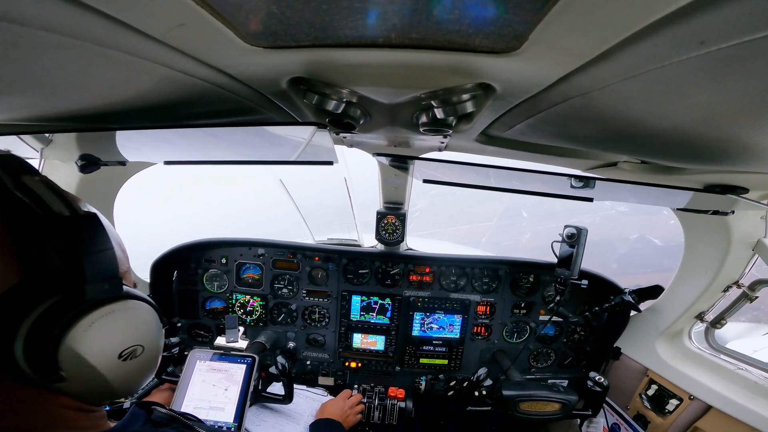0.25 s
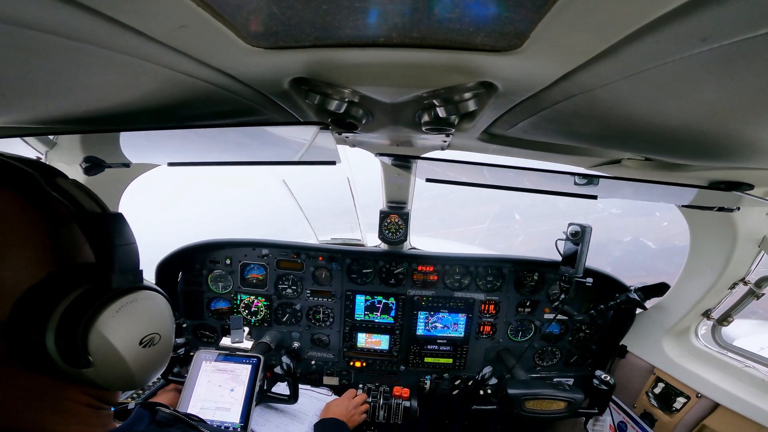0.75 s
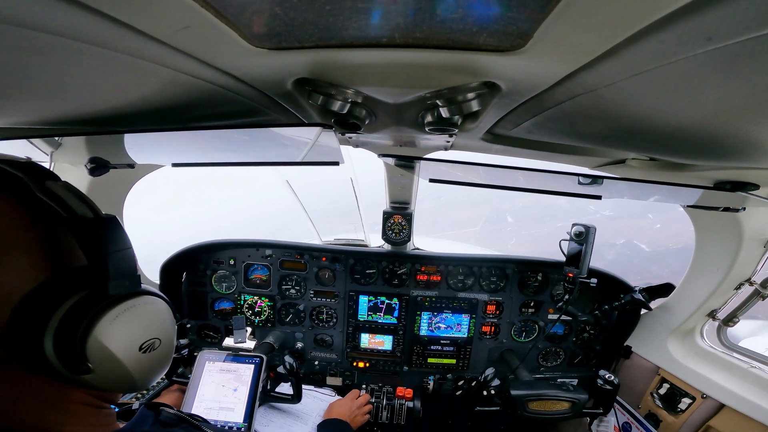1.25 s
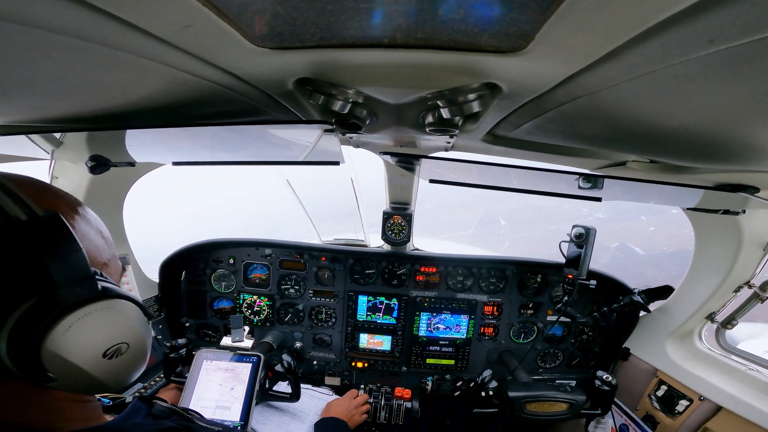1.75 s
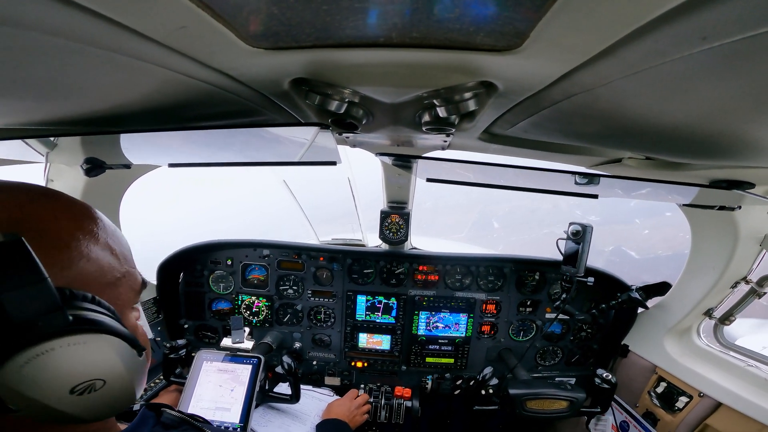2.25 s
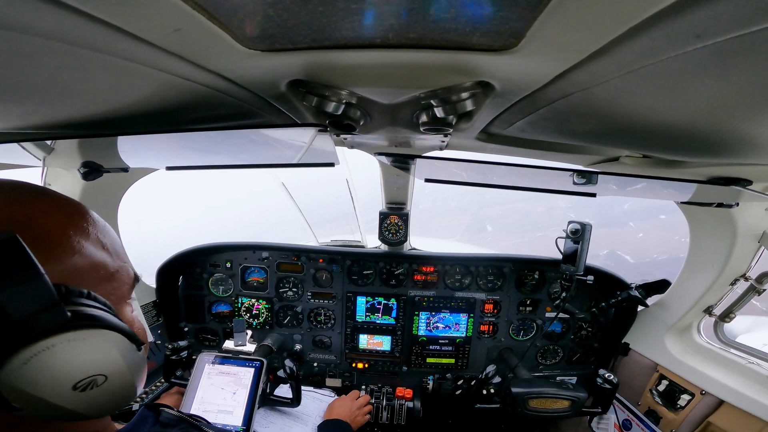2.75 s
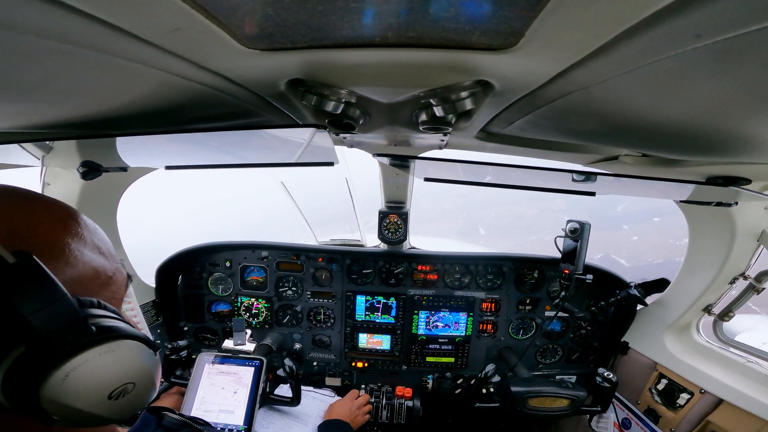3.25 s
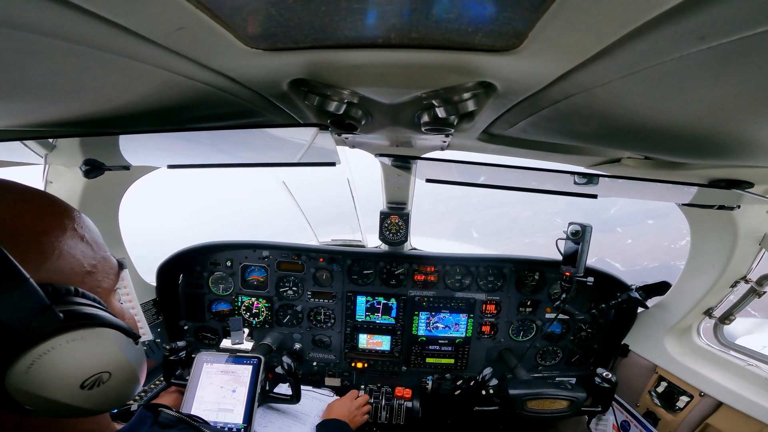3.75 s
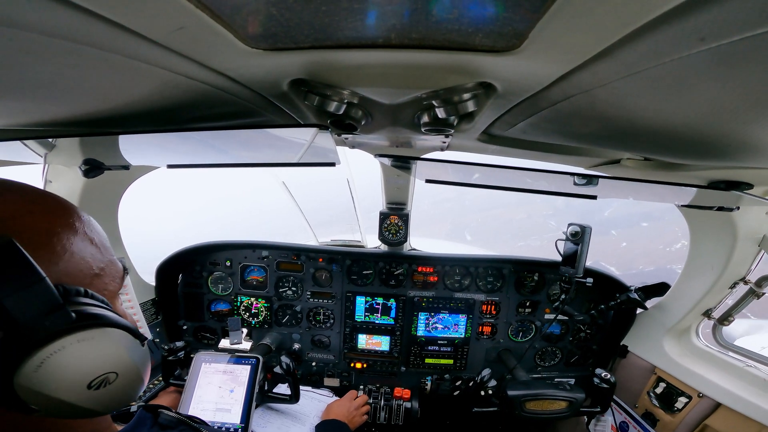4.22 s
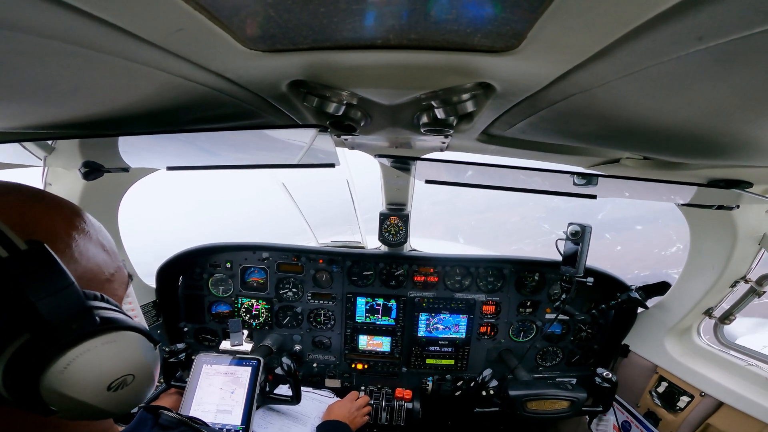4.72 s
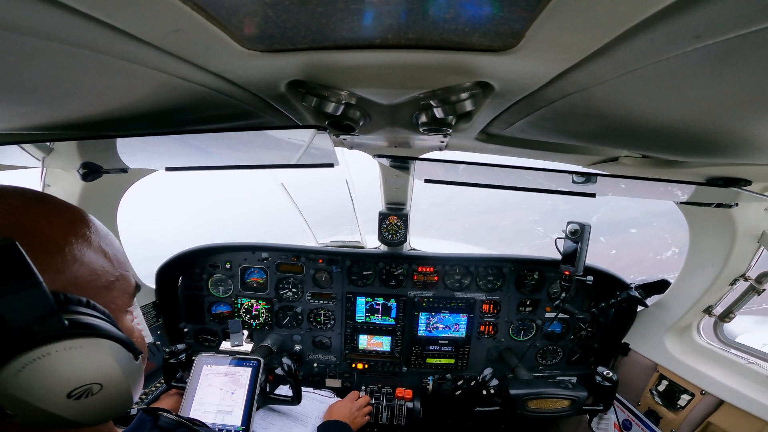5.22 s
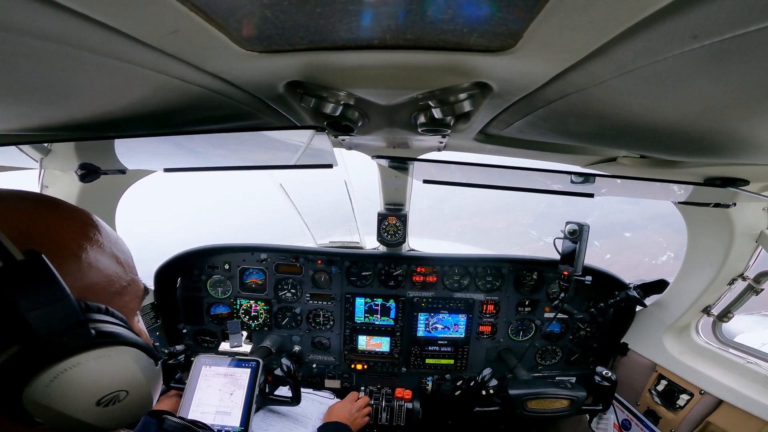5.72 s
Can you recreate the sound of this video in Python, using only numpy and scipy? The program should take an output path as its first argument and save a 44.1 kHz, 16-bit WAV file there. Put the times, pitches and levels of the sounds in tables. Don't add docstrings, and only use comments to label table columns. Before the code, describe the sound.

Steady deep drone of twin piston engines and propellers inside a small aircraft cockpit, with booming cabin rumble and soft windscreen hiss.

```python
import sys
import numpy as np
from scipy import signal
from scipy.fft import rfft, irfft, next_fast_len
from scipy.io import wavfile
from scipy.ndimage import uniform_filter1d, minimum_filter1d

SR = 44100
rng = np.random.default_rng(int(sys.argv[2]) if len(sys.argv) > 2 else 0)


def linear_from_db(decibels):
    return 10 ** (np.asarray(decibels, float) / 20)


def wav_record(signal):
    frames = np.transpose(np.atleast_2d(signal))
    bounded = np.clip(frames, -1, 1)
    quanta = np.round(bounded * 32767).astype(np.int16)
    wavfile.write(sys.argv[1], SR, quanta)


N = 263718

# (time [s], shaft speed [Hz])
SHAFT_SPEED = [(0.0, 37.673), (0.52, 37.511), (0.91, 37.874), (1.28, 37.711), (1.84, 37.697), (2.1, 37.506),
               (2.93, 37.848), (3.56, 37.503), (3.96, 37.798), (4.5, 37.517), (5.02, 37.444),
               (5.42, 37.645), (5.98, 37.554)]
# (time [s], angle ahead [rad])
SHAFT_SLIP = [(0.0, 0.0), (1.09, -0.63), (1.68, -0.52), (2.28, -0.25), (2.89, -0.5), (3.53, -0.23),
              (4.03, -0.38), (5.14, -0.45), (5.63, -1.12), (5.98, -1.36)]
# (multiple of shaft speed [1], left level [dB], right level [dB], left lag [rad], right lag [rad])
SHARED_HUMS = [
    (1, -46, -40.5, 0, 2.43),
    (3, -46.5, -60, 2.4, 2.46),
    (6, -61, -49, 2.27, 3.33),
    (9, -72, -52.5, 0, .16),
]
# (multiple of shaft speed [1], level [dB])
ENGINE_HUMS = [(.5, -65), (1.5, -63), (2, -68.5), (2.5, -67), (3.5, -61), (4, -59.5), (4.5, -60),
               (5, -64.5), (5.5, -62.5), (7, -62.5), (7.5, -72.5), (8.5, -73), (10, -68), (12, -68.5),
               (12.5, -76), (13, -75.5), (13.5, -80), (14, -76.5), (15, -78), (16, -73.5), (18, -75.5),
               (19.5, -78.5), (22, -77), (25.5, -80), (40.5, -84), (20, -82), (21.5, -81), (22.5, -81),
               (23, -84), (25, -80)]
RIGHT_HUMS = (4.5, 7, 9, 10, 16, 18, 22)
# (time [s], level over mean [dB])
LEFT_LOAD = [(0, 4.5), (.3, -2), (1.5, 2), (2.4, 0.5), (2.7, -2), (3.1, -2), (3.75, 4.5), (4.3, 0),
             (4.92, -4.5), (5.2, 3), (5.6, -2.5), (5.98, 5.5)]
# (time [s], level over mean [dB])
RIGHT_PROP_LOAD = [(0, 1.5), (.7, -1), (1.3, -1.5), (2.0, -0.5), (2.7, 1.5), (3.1, 0), (3.6, 1), (4.2, 0.5),
                   (4.8, 0.5), (5.3, -2.5), (5.98, 1)]
# (time [s], level over mean [dB])
EXHAUST_SWELL = [(0, -2), (.5, -2), (1.0, 5), (1.5, 2), (2.0, 7.5), (2.4, -0.5), (2.9, -3), (3.5, -3),
                 (4.0, 1.5), (4.35, -10), (4.9, -5), (5.3, -2), (5.98, 3)]
EXHAUST_RANGE = (12.5, 15)
FLYWHEEL_S = .2

# (multiple of shaft speed [1], level [dB])
ALTERNATOR_WHINE = [(72, -94.5), (108, -91), (216, -91.5), (324, -95)]
BELT_WOBBLE_RAD, WHINE_FLICKER_DB = .6, 1.5

# (start [s], length [s], level [dB], start pitch [Hz])
PANEL_BOUTS = [
    (.05, .25, -73, 1000),
    (.36, .62, -68, 989),
    (1.28, .52, -70.5, 992),
    (1.9, .24, -70, 988),
    (2.28, .4, -73.5, 995),
    (3.46, .4, -70, 986),
    (4.15, .35, -74, 999),
    (4.7, .38, -72, 996),
    (5.3, .45, -72, 977),
    (5.75, .25, -73, 987),
]
PANEL_CLIMB_HZ_PER_S, PANEL_FADE_S = 22, .07

# (time [s], centre [Hz], level [dB], overtone level [dB])
SEAL_LEAK = [(0, 1724, -74, -87), (.55, 1720, -73, -79), (0.801, 2094, -78, -86), (1.1, 2108, -74, -83),
             (2.0, 2080, -76, -81), (2.3, 1716, -81, -87), (2.8, 1720, -74, -75), (3.3, 1718, -75, -79),
             (4.0, 1712, -73, -81), (4.6, 1717, -77, -79), (5.98, 1730, -74, -79)]
LEAK_WIDTH_SHARE, LEAK_OVERTONE = .07, 1.565

# (pitch [Hz], width [Hz], level per Hz [dB])
CABIN_MODES = [(35.5, 9.9, -81), (66.4, 8.7, -62.5), (95.7, 3.6, -70), (121, 14, -64.5), (138, 12, -67.5),
               (166.4, 28, -70), (231.4, 17, -72), (258.2, 32.6, -67.5), (329, 39, -79), (349.6, 24.4, -78),
               (367, 13.6, -80), (399, 14.5, -86), (490, 44, -98), (832, 21, -89.5), (998, 40, -94),
               (1293, 153, -92), (1740, 88, -101), (2050, 330, -102.5), (2390, 71, -101), (2640, 92, -103),
               (3295, 120, -104)]
# (frequency [Hz], level per Hz [dB])
AIRFRAME_RUMBLE = [(2, -71.5), (10, -69.5), (25, -77), (50, -81), (85, -77), (200, -72.5), (290, -79.5),
                   (420, -86), (600, -89.5), (1100, -90), (1500, -100), (3000, -112), (6000, -130)]
# (time [s], level over mean [dB])
CABIN_BUFFET = [(0, 1.5), (.4, .5), (.75, 0.5), (1.1, 1), (1.4, 0), (1.8, 0), (2.25, -1), (2.6, 0.5),
                (3.1, 0.5), (3.5, -1), (3.9, -0.5), (4.4, -0.5), (4.7, -1), (5.0, -1), (5.4, 0), (5.98, -1)]

# (frequency [Hz], level per Hz [dB])
WINDSCREEN_HISS = [(300, -110), (1000, -100), (2000, -100), (3000, -103), (4200, -103), (5300, -107),
                   (6300, -113), (8000, -122), (11000, -135)]
# (time [s], hiss level [dB])
WIND_GUSTS = [(.08, -71.5), (.9, -71.5), (.97, -68.5), (1.9, -68.5), (2.25, -72), (2.38, -68),
              (2.55, -69.5), (3.1, -69.5), (3.75, -68.5), (4.2, -69.5), (4.7, -68), (5.15, -69),
              (5.55, -67.5), (5.95, -69)]
GUST_TREBLE_HZ, GUST_LOW_SHARE = 2500, 0.76

# (lower border [Hz], upper border [Hz])
BAND_BORDERS = (180, 614)
# (reaction [s], share of a swell held down [0-1])
BAND_HOLD = [
    (0.023, 0.88),
    (0.006, 0.5),
    (0.0022, 0.57),
]
SETTLE_S, CEILING_DB, CEILING_S = .5, -31.5, .002
MIC_HISS_DB = -75
TOP_HZ, THINNED_HZ, THINNED_SHARE = 15735, 14980, .46
HOLES_FROM_HZ, HOLE_SHARE = 9800, .035


def control(table):
    line = np.interp(np.arange(N) / SR, *np.transpose(table))
    return uniform_filter1d(line, int(FLYWHEEL_S * SR), mode="nearest")


def walk(rate):
    hold = int(SR / rate)
    steps = np.repeat(rng.standard_normal(N // hold + 1), hold)
    return 1.3 * uniform_filter1d(uniform_filter1d(steps, hold), hold)[:N]


def noise(db, hz):
    white = rfft(rng.standard_normal(2 * len(hz) - 2))
    return irfft(white * linear_from_db(db))[:N] * np.sqrt(SR / 2)


def spectrum(points, hz):
    point_hz, point_db = np.array(points).T
    return np.interp(np.log(hz + 1e-9), np.log(point_hz), point_db)


def engines(left, right):
    out = 0
    for multiple, left_db, right_db, left_lag, right_lag in SHARED_HUMS:
        left_load_db = control(LEFT_LOAD) if multiple == 3 else 0
        right_load_db = control(RIGHT_PROP_LOAD) if multiple == 6 else 0
        out = out + linear_from_db(left_db + left_load_db) * np.sin(multiple * left + left_lag)
        out = out + linear_from_db(right_db + right_load_db) * np.sin(multiple * right + right_lag)
    for multiple, db in ENGINE_HUMS:
        start = rng.uniform(0, 2 * np.pi)
        swell_db = (.7 if multiple % 3 == 0 else 2.0) * walk(2.5)
        if EXHAUST_RANGE[0] <= multiple <= EXHAUST_RANGE[1]:
            swell_db = swell_db + control(EXHAUST_SWELL)
        waver = .15 * walk(2)
        angle = right if multiple in RIGHT_HUMS else left
        out = out + linear_from_db(db + swell_db) * np.sin(multiple * angle + start + waver)
    return np.sqrt(2) * out


def alternator(left):
    flicker = linear_from_db(WHINE_FLICKER_DB * walk(12))
    wobble = BELT_WOBBLE_RAD * np.sin(2 * left)
    whine = sum(linear_from_db(db) * np.sin(multiple * left + wobble) for multiple, db in ALTERNATOR_WHINE)
    return np.sqrt(2) * flicker * whine


def panel():
    out, unsteady = 0, 0.29 * walk(17)
    for start, length, db, hz in PANEL_BOUTS:
        age = np.arange(N) / SR - start
        fade = np.clip(np.minimum(age, length - age) / PANEL_FADE_S, 0, 1)
        turns = (hz + PANEL_CLIMB_HZ_PER_S * age / 2) * age
        out = out + linear_from_db(db) * fade * np.sin(2 * np.pi * turns + unsteady)
    return np.sqrt(2) * out


def leak():
    s, hz, db, overtone_db = np.transpose(SEAL_LEAK)
    t, out = np.arange(N) / SR, 0
    angle = 2 * np.pi * np.cumsum(control(list(zip(s, hz)))) / SR
    rate = LEAK_WIDTH_SHARE * hz[0] * 2
    for ratio, level_db in ((1, db), (LEAK_OVERTONE, overtone_db)):
        band = walk(rate) * np.sin(ratio * angle) + walk(rate) * np.cos(ratio * angle)
        out = out + linear_from_db(np.interp(t, s, level_db)) * band
    return out


def cabin(hz):
    power = linear_from_db(2 * spectrum(AIRFRAME_RUMBLE, hz))
    for mode_hz, width, db in CABIN_MODES:
        offset = (hz - mode_hz) / width * 1.3
        power = power + linear_from_db(2 * db) / (1 + offset ** 2) ** 2
    return noise(10 * np.log10(power), hz) * linear_from_db(.4 * walk(5) + control(CABIN_BUFFET))


def slipstream(hz):
    gust_db = np.interp(np.arange(N) / SR, *np.transpose(WIND_GUSTS)) + 69.12
    treble = 1 / (1 + (GUST_TREBLE_HZ / (hz + 1)) ** 4)
    colour_db = spectrum(WINDSCREEN_HISS, hz)
    body = noise(colour_db + 10 * np.log10(1 - treble), hz)
    body = body * linear_from_db(GUST_LOW_SHARE * gust_db + .5 * walk(4.0))
    top = noise(colour_db + 10 * np.log10(treble), hz)
    top = top * linear_from_db(gust_db + 0.31 * walk(14))
    return (body + top) * linear_from_db(-0.5 + 1.06 * walk(30))


def scene():
    left = 2 * np.pi * np.cumsum(control(SHAFT_SPEED)) / SR
    right = left + control(SHAFT_SLIP)
    hz = np.fft.rfftfreq(2 ** 19, 1 / SR)
    tones = engines(left, right) + alternator(left) + panel()
    air = leak() + cabin(hz) + slipstream(hz)
    return (tones + air)[None]


def squeeze(x):
    size = next_fast_len(N + SR // 4)
    hz, bins = np.fft.rfftfreq(size, 1 / SR), rfft(x, size)
    low, mid = (1 / (1 + (hz / edge_hz) ** 8) for edge_hz in BAND_BORDERS)
    bands = []
    for weight, (reaction, share) in zip((low, mid - low, 1 - mid), BAND_HOLD):
        band = np.fft.ifft(2 * bins * weight, size)[:N]
        power = uniform_filter1d(np.abs(band) ** 2, max(int(reaction * SR), 1))
        settled = uniform_filter1d(power, int(SETTLE_S * SR))
        bands.append(band.real * (0.16 + 0.9 * power / settled) ** (-share / 2))
    body, span = bands[0] + bands[1], int(CEILING_S * SR)
    gain = np.minimum(1, linear_from_db(CEILING_DB) / (np.abs(body) + 1e-9))
    gain = uniform_filter1d(minimum_filter1d(gain, span), span)
    return body * gain + bands[2]


def thin_treble(x):
    hz, _, frames = signal.stft(x, SR, nperseg=1024, noverlap=512)
    count = frames.shape[1]
    strip = np.clip((hz - THINNED_HZ) // 250 + 1, 0, 3).astype(int)
    kept = np.repeat(rng.random((4, count)) > THINNED_SHARE, 2, axis=1)[:, :count]
    kept[0] = True
    holes = np.repeat(rng.random((129, count)) < HOLE_SHARE, 4, axis=0)
    holes = np.repeat(holes, 2, axis=1)[:len(hz), :count]
    frames = frames * (1 - holes * (hz > HOLES_FROM_HZ)[:, None])
    frames = frames * kept[strip] * (hz < TOP_HZ)[:, None]
    return signal.istft(frames, SR, nperseg=1024, noverlap=512)[1][:N]


def top_cut(x):
    return signal.sosfilt(signal.butter(12, 16100, fs=SR, output="sos"), x)


def record(dry):
    x = squeeze(dry[0]) + linear_from_db(MIC_HISS_DB) * rng.standard_normal(N)
    mix = thin_treble(x)[None]
    return top_cut(mix)


dry = scene()
out = record(dry)
wav_record(out)
```